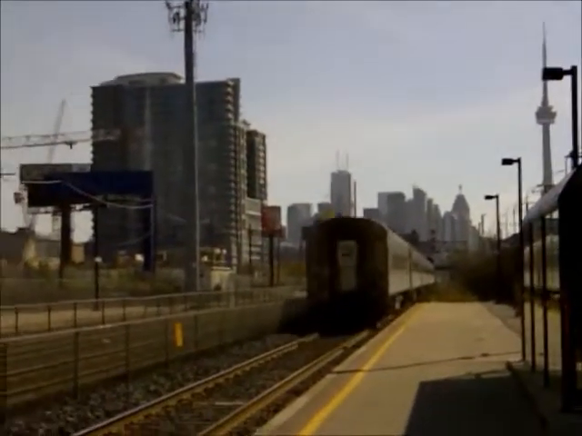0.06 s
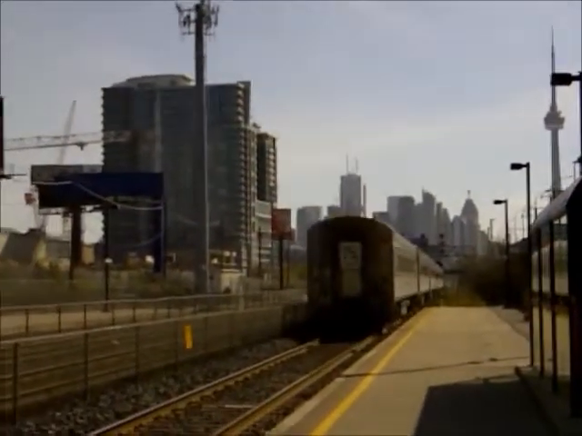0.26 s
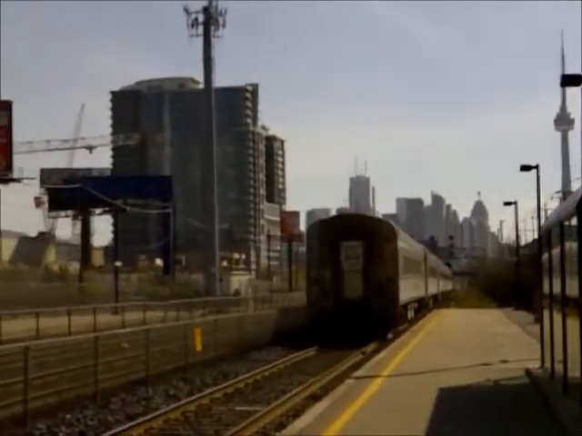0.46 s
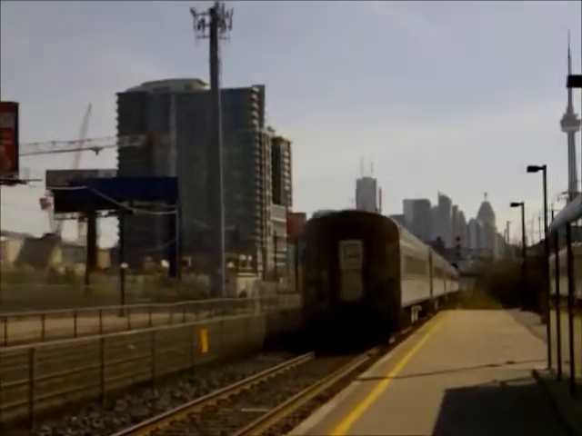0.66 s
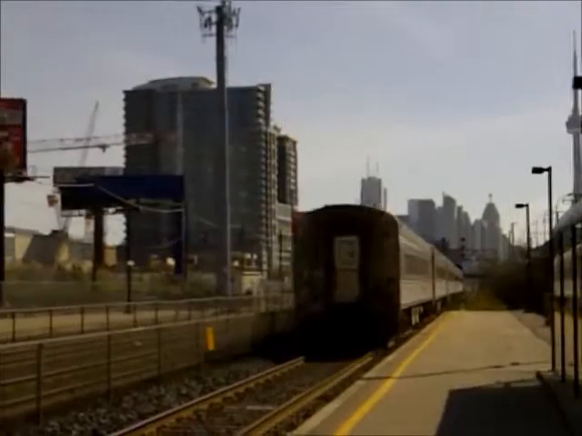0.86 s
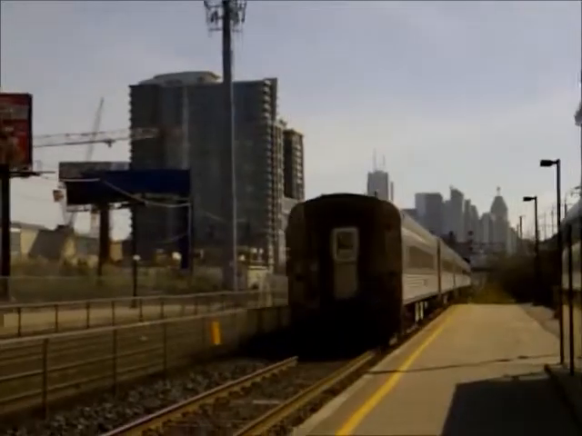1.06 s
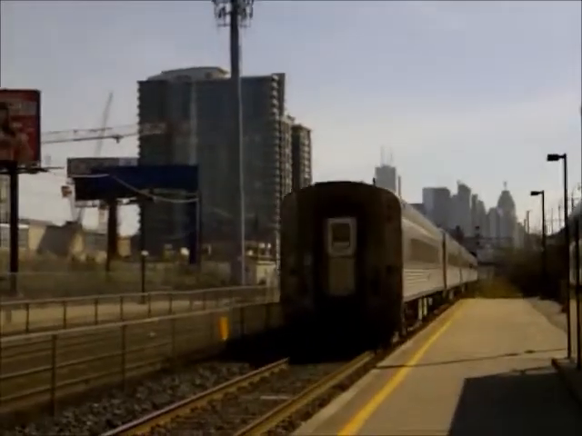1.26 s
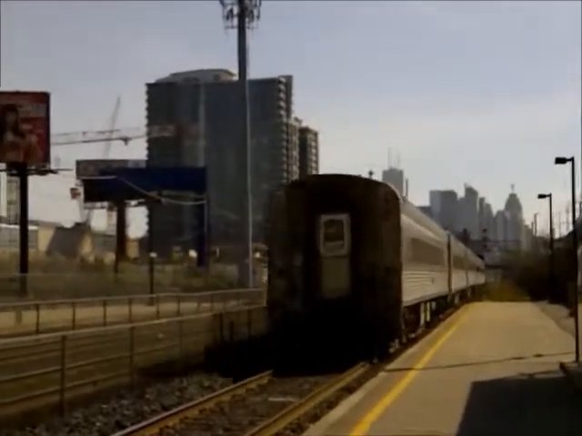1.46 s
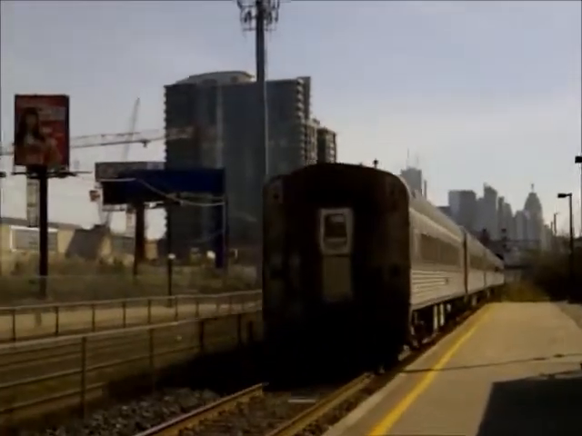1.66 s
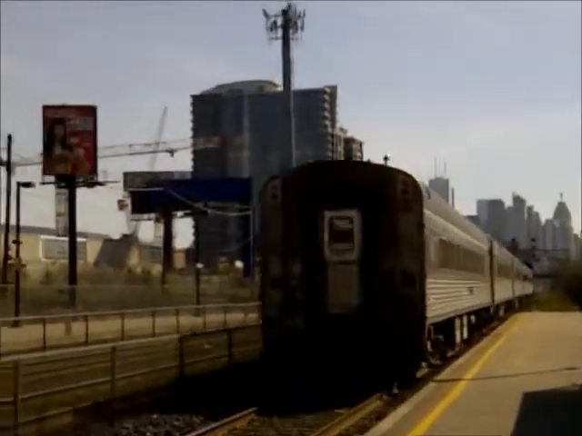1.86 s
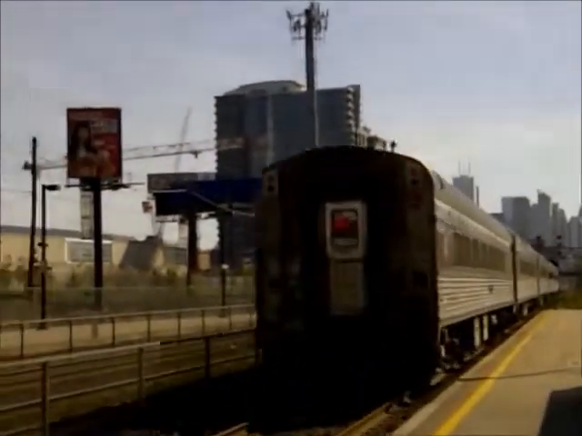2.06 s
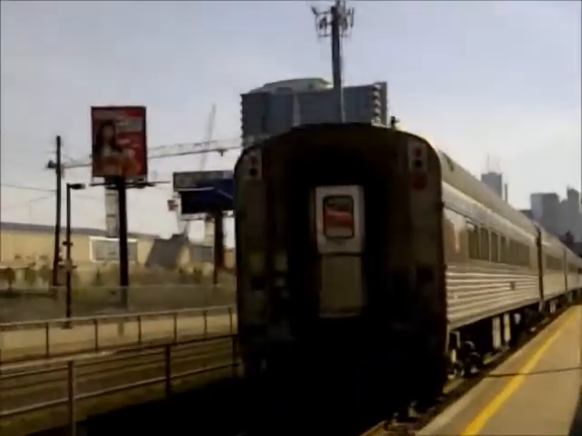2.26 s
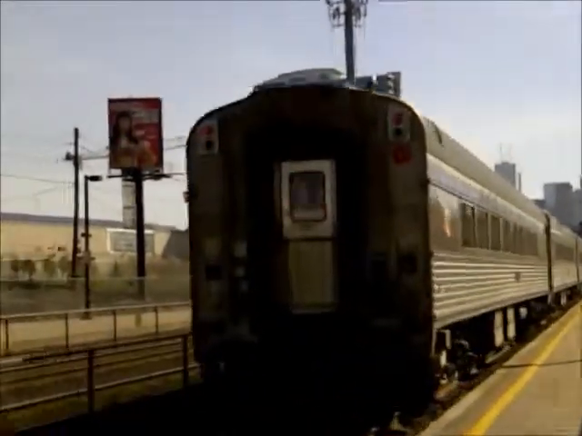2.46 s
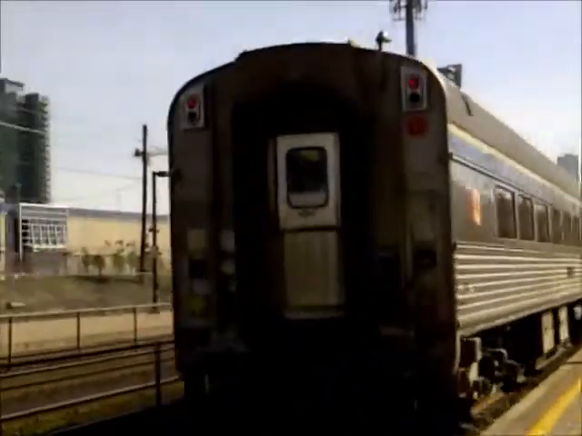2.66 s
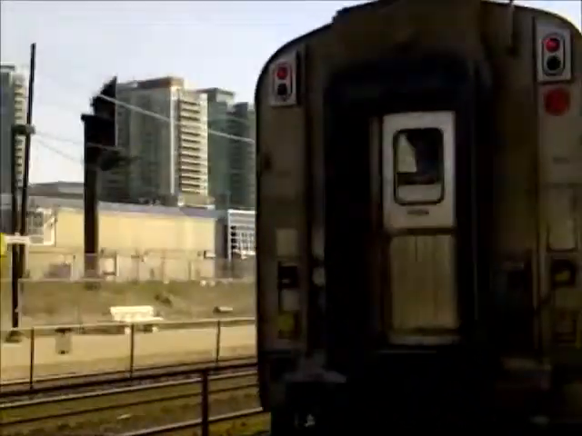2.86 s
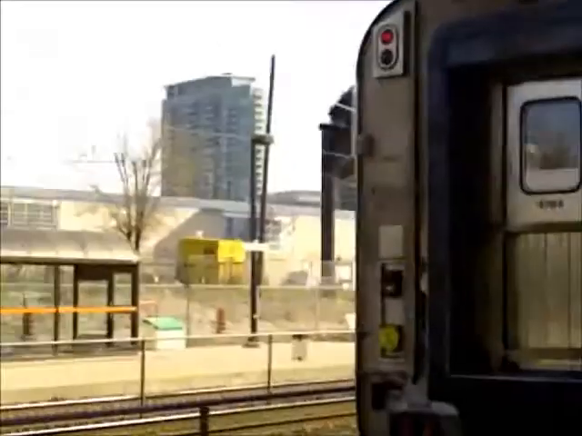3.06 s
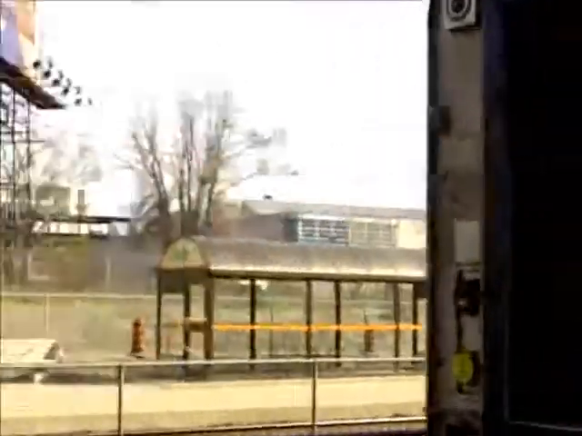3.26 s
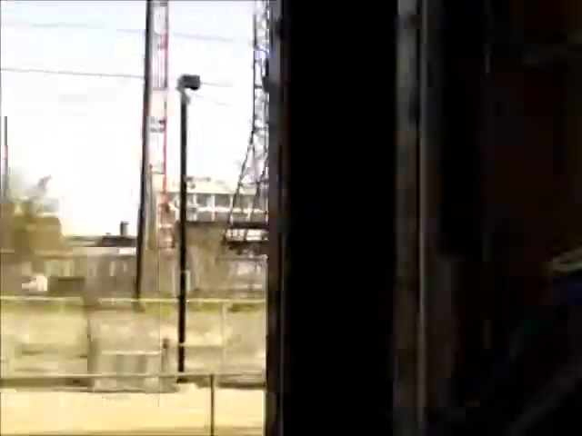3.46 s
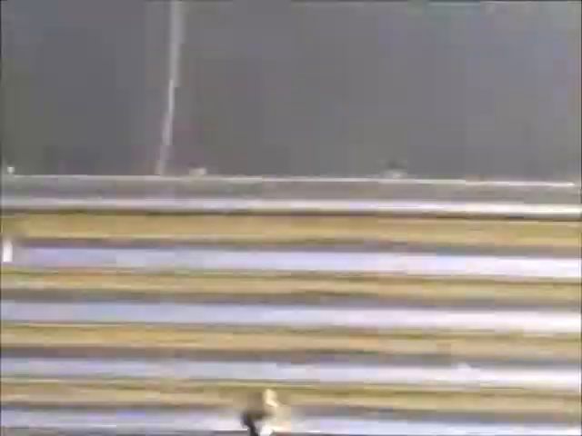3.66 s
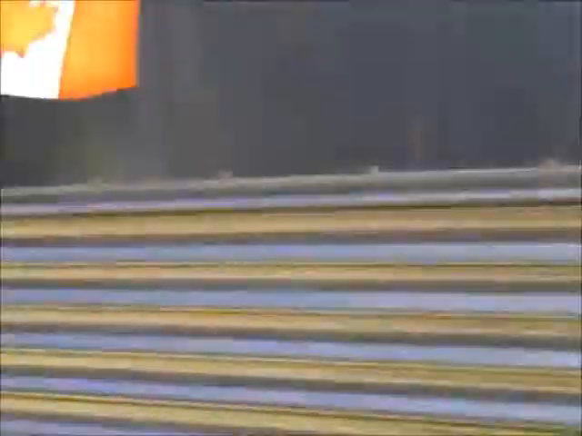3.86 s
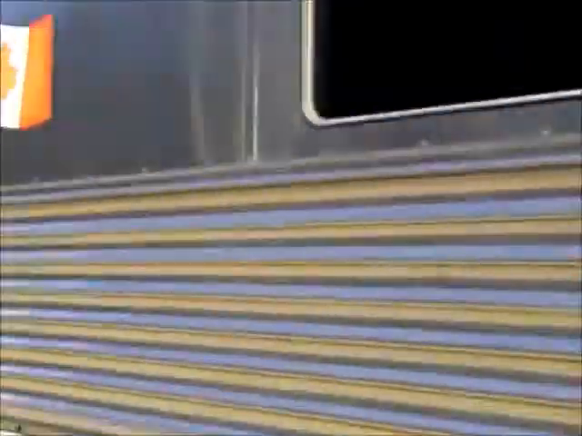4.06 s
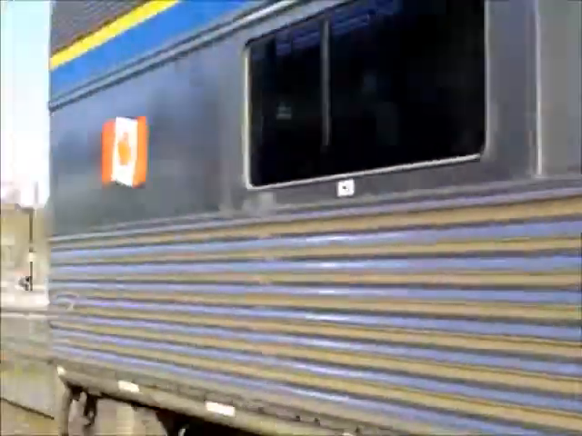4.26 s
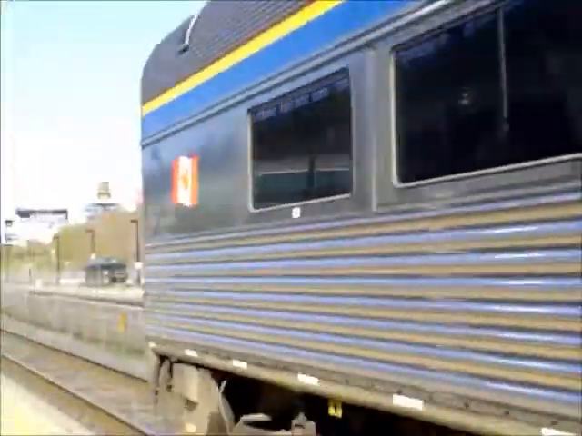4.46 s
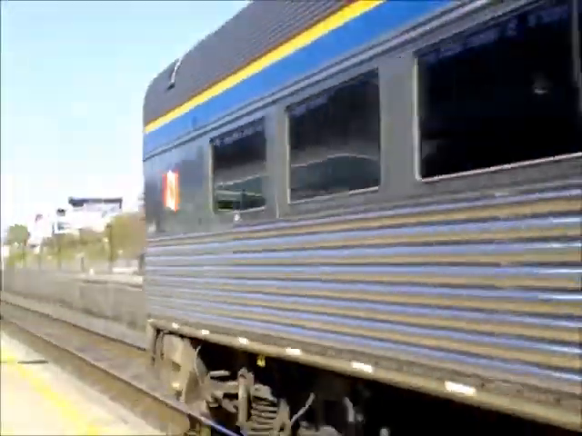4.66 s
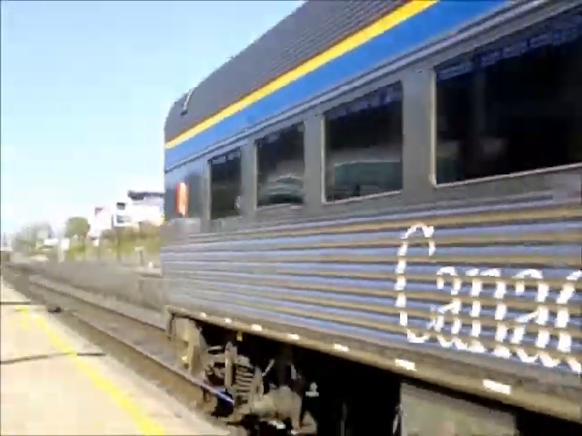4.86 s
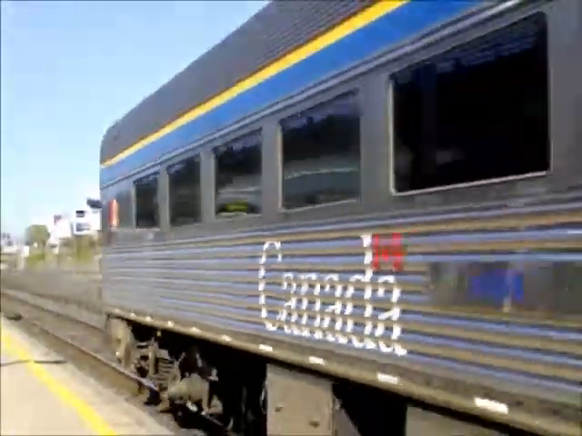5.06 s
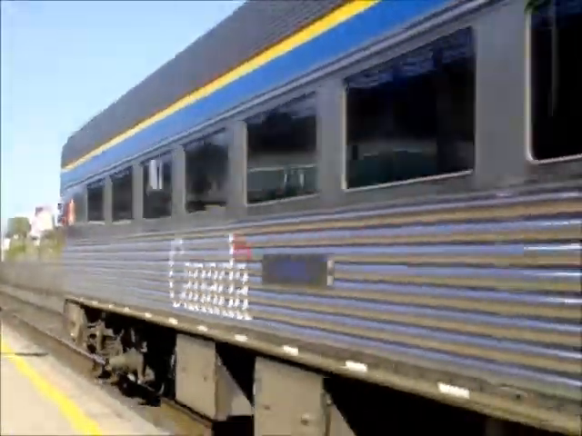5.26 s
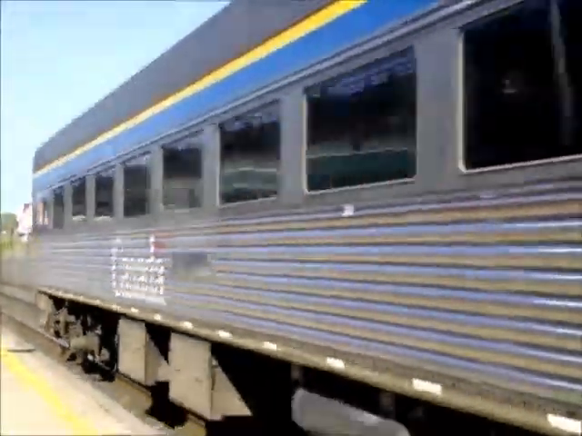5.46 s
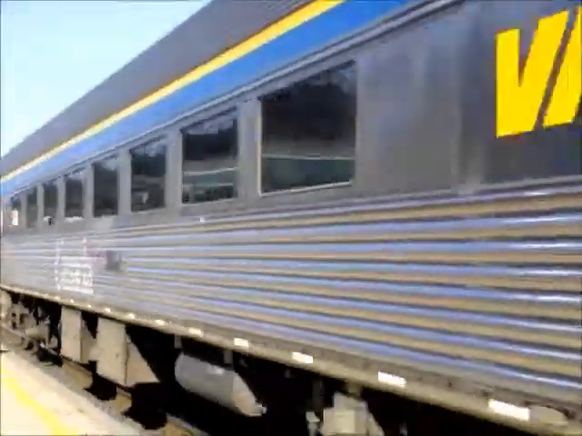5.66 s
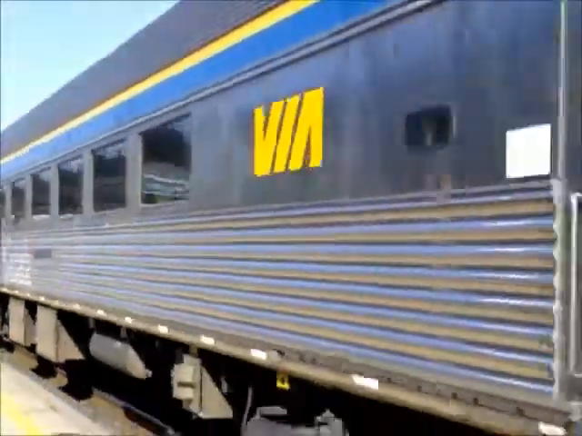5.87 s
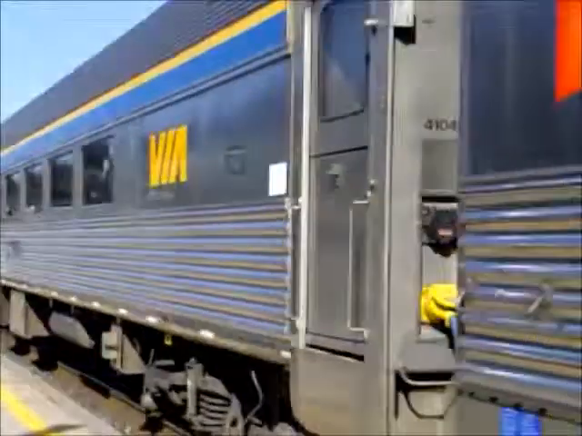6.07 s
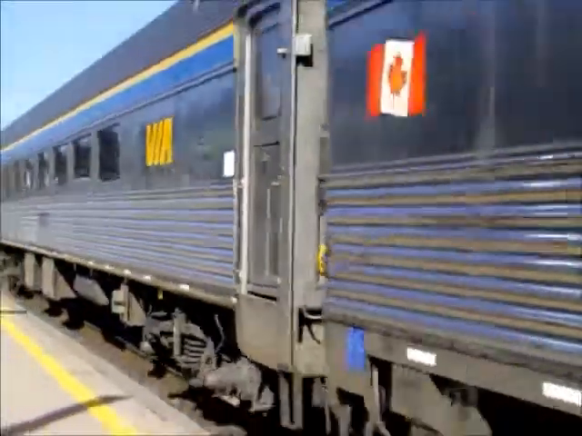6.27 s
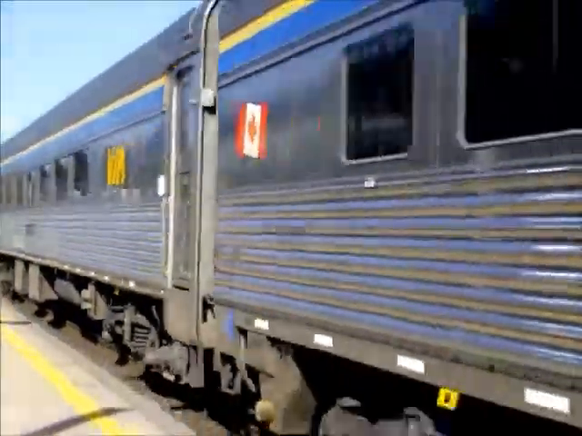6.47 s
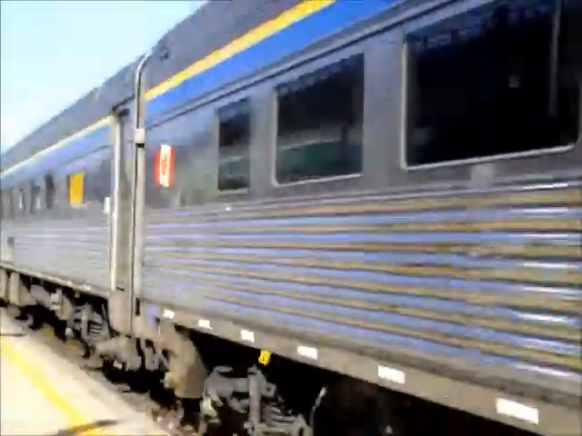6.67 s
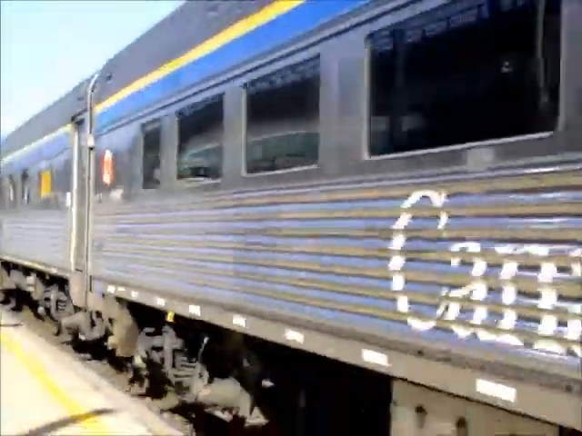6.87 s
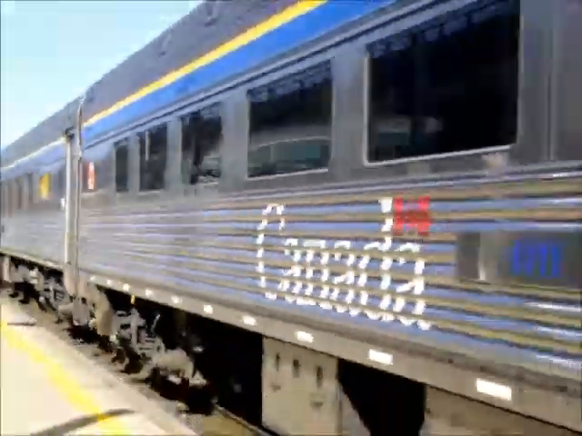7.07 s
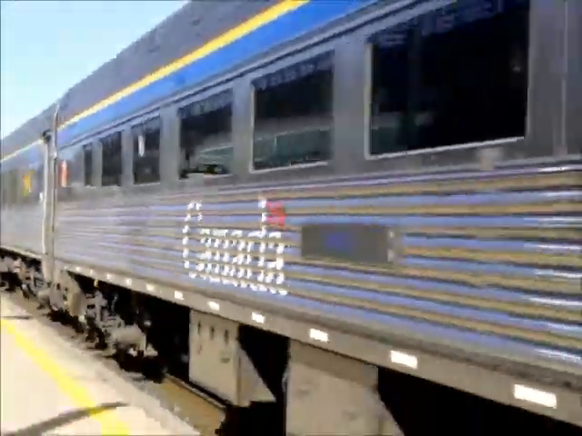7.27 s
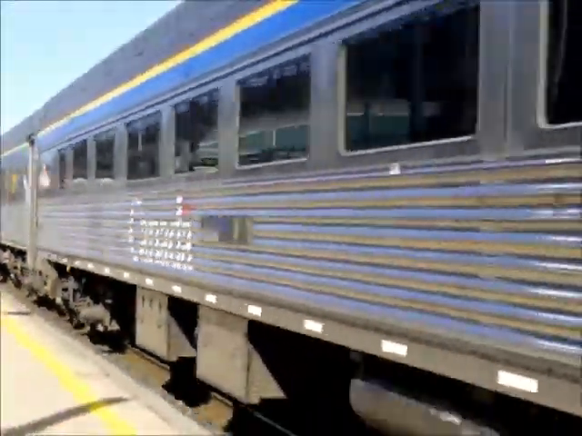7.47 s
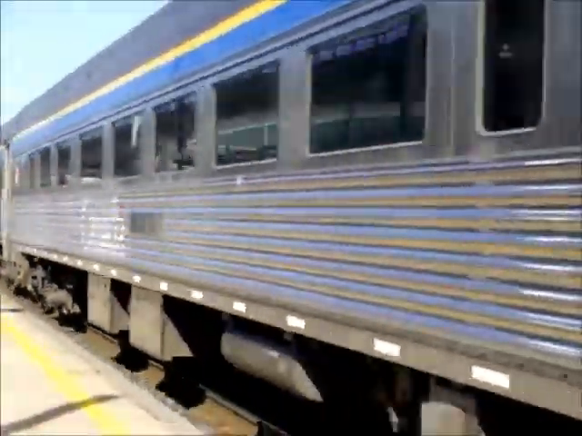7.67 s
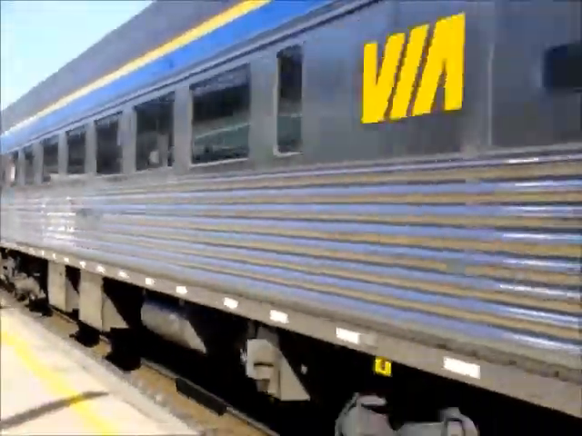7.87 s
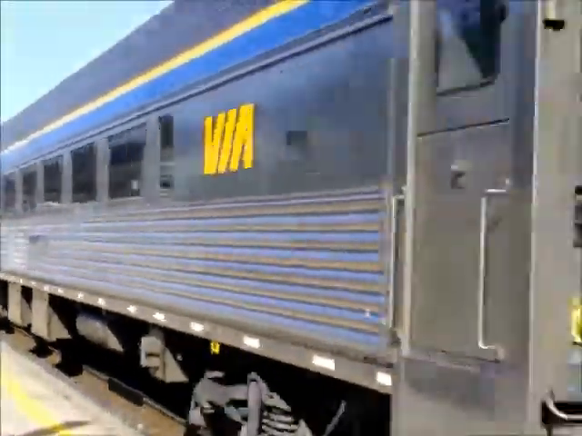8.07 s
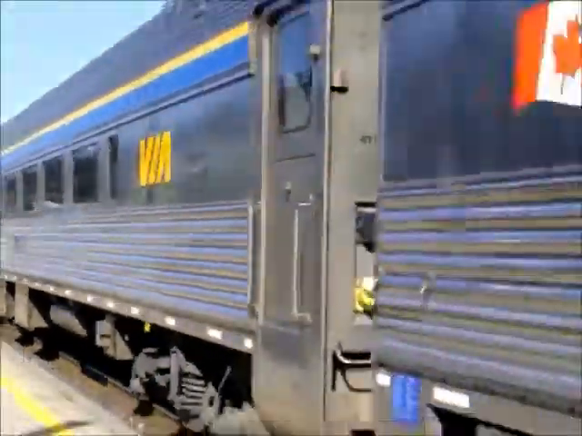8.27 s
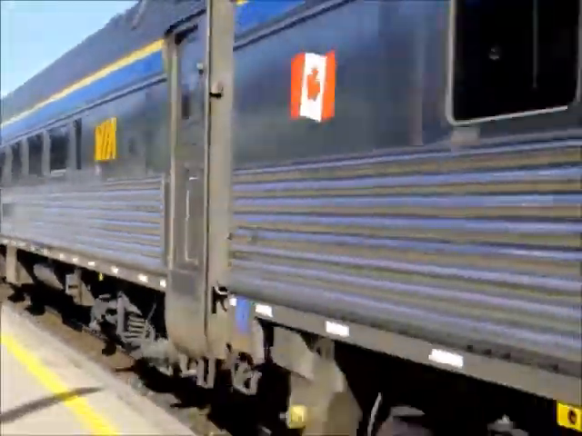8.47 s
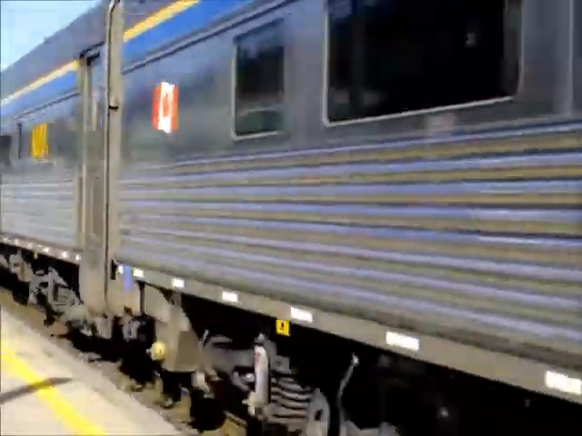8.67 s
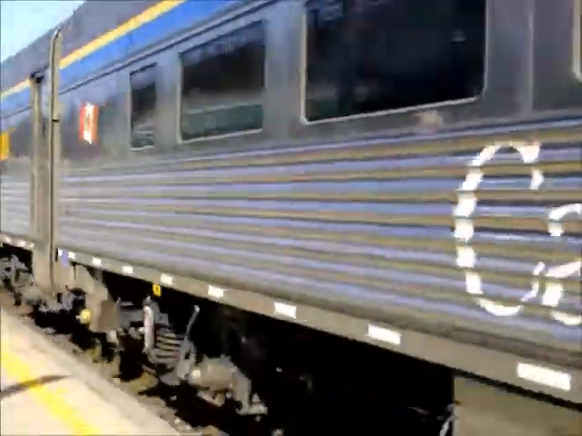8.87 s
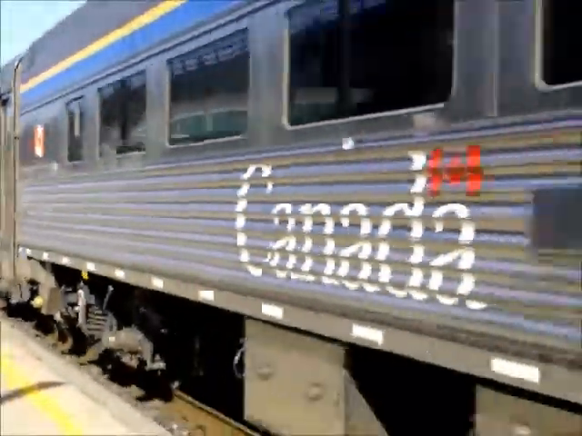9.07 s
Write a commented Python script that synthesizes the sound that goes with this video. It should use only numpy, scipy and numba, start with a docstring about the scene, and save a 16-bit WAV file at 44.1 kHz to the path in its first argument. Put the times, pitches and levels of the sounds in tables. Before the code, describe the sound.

Outdoors on a station platform, heard through a small microphone with no deep bass, a dull top and fast ducking after peaks. From 0 to 1 s there is low town rumble, a distant rail murmur, a few dry ticks and a soft clank near 0.6 s. From 1.0 to 1.6 s a dense, loud jumble of steel clanks, thuds and thin sizzle erupts. It settles into gentle rolling until 2.5 s, when more clanks run to 2.9 s. The roar swells quickly, with heavy blows at 3.2 and 3.4 s, and is full and close by 4 s. Until 9.1 s the coaches roll past in a rough, surging roar with loose clatter and faintly wavering wheel singing. Scattered clanks and short knocks mark bogies around 4.7, 5.2, 6.2, 7, 7.6 and 8.4 s. A low motor hum strengthens around 6.75 s. The roar barely eases and ends mid-pass.

```python
"""A slow passenger train rolls up to a station platform and passes close by, over a rumbling town.
Its wheels roar (bands of noise) and sing faintly (narrow noise), and a motor hums (wavering sines).
Bogies clank and loose gear clatters: short rough blows set off the fading tones of struck steel.
Broad thuds, thin sizzle and dry ticks are shaped bursts of noise.
A small microphone's fast limiter ducks just after every loud peak."""
import sys
import numpy as np
from scipy import signal
from scipy.fft import irfft, next_fast_len
from scipy.io import wavfile
from scipy.ndimage import uniform_filter1d
from numba import njit

SR = 44100
rng = np.random.default_rng(int(sys.argv[2]) if len(sys.argv) > 2 else 0)


def to_linear_factor(level_db):
    """Convert decibel levels (scalar or array-like) to linear amplitude factors."""
    exponent = np.asarray(level_db, float) / 20
    return 10 ** exponent


def pcm_store(signal):
    """Save signal as 16-bit PCM."""
    levels = np.round(np.clip(np.atleast_2d(signal), -1, 1) * 32767)
    wavfile.write(sys.argv[1], SR, levels.astype(np.int16).T)


N = 402633  # length in samples


def curve(table):
    """Columns of a table joined by straight lines in time."""
    s, *columns = np.transpose(table)
    return [np.interp(np.arange(N) / SR, s, c) for c in columns]


def unit(x):
    """Scaled to rms 1."""
    return x / np.sqrt(np.mean(x ** 2))


def peak(x):
    """Scaled to peak 1."""
    return x / np.abs(x).max()


def add(out, s, sound):
    """Mix a short sound in at a time in seconds."""
    i = int(s * SR)
    out[i:i + len(sound)] += sound[:N - i]


def walk(rate):
    """Slow chance: random levels, `rate` of them a second, joined smoothly, spread 1."""
    k = int(SR / rate)
    levels = np.repeat(rng.standard_normal(N // k + 1), k)
    return unit(uniform_filter1d(levels, k)[:N])


def band(hz, width):
    """Noise in a bell-shaped band, rms 1."""
    size = next_fast_len(N)
    f = np.arange(size // 2 + 1) * SR / size
    chance = rng.standard_normal((2, len(f)))
    spectrum = (chance[0] + 1j * chance[1]) * np.exp(-((f - hz) / width) ** 2)
    return unit(irfft(spectrum, size)[:N])


def tone(hz, width):
    """Noise ringing a resonance whose pitch may move and drifts a little."""
    turn = 2 * np.pi * np.cumsum(hz * (1 + .012 * walk(2))) / SR
    return unit(band(0, width / 2) * np.cos(turn) + band(0, width / 2) * np.sin(turn))


def controls():
    """Rolling level as the train nears and passes, and treble, bass, grind and rail ring above it."""
    # the train drawing near and rolling past:
    # (t/s, rolling level/dB, and above it: treble level/dB, bass level/dB, middle level/dB)
    approach = [(0, -32, 10, 5.5, -20), (1.0, -28, 1.5, 25.5, 5), (1.75, -24, 6.5, -5, 2),
                (2.1, -22.5, 4, 0, 3.5), (2.44, -25, 7, 0, 5.5), (3.0, -14.5, 3.5, -8.5, 1),
                (3.45, -11.5, 2, 2, -3.5), (3.95, -9, 4, -0.5, -2.5), (4.5, -11, 2.5, -1, -4),
                (5.1, -13, 6, 1, -4), (5.7, -9.5, 3.5, 2.5, -2.5), (6.3, -11, 2.5, 4, -4.5),
                (6.9, -11.5, 2.5, 4, -4), (7.6, -9.5, 2.5, 5, -2.5), (8.3, -11.5, 0, 4.5, -5.5),
                (9.13, -12, 5, 5.5, -4.5)]
    # a bogie shudders after crossing a joint: (start t/s, length/s, roll rise level/dB, treble rise level/dB)
    shudders = [(1.024, 0.25, 3.5, 5), (1.23, 0.41, 1, 4), (2.49, 0.16, 3, -1), (2.67, 0.22, 1, 4.5)]
    # the level dips briefly: (t/s, level/dB)
    dips = [(6.65, -6.5), (8.139, -6.5)]
    alongside_db = -16  # rolling level once the coaches are alongside
    edge_s, dip_s = 0.14, 0.019  # fade at both ends of a shudder, width of a dip
    bass_per_db = -2.3  # bass dB for each dB of rise: the bass does not rise with it
    ring_per_db = 0.89  # rail ring carries along the track: dB kept for each dB that distance takes

    t = np.arange(N) / SR
    roll_db, hiss_db, boom_db, grind_db = curve(approach)
    far_db = np.maximum(alongside_db - roll_db, 0)
    for s, length, rise_db, treble_db in shudders:
        on = np.clip(np.minimum(t - s, s + length - t) / edge_s + .5, 0, 1)
        roll_db = roll_db + rise_db * on
        hiss_db = hiss_db + treble_db * on
        boom_db = boom_db + bass_per_db * rise_db * on
    roll_db = roll_db + sum(db * np.exp(-((t - s) / dip_s) ** 2) for s, db in dips)
    return roll_db, hiss_db, boom_db, grind_db, ring_per_db * far_db


def roar(spectrum, lean_db, together_db, flicker_db):
    """Third-octave bands of noise that surge together and flicker alone."""
    f, db = np.transpose(spectrum)
    centres = 25 * 2 ** (np.arange(25) / 3)
    power = to_linear_factor(np.interp(np.log(centres), np.log(f), db)) ** 2 * centres
    surge = together_db * (.6 * walk(11) + 0.6 * walk(24))
    bright = together_db * (.4 * walk(7) + .5 * walk(18))  # the treble surges on its own as well
    out = np.zeros(N)
    for hz, p in zip(centres, power):
        moving_db = min(0.25 + hz / 1200, 1) * surge + np.clip(hz / 1500 - .6, 0, 1) * bright
        moving_db = moving_db + flicker_db * walk(7)
        out += np.sqrt(p / power.sum()) * to_linear_factor(lean_db(hz) + moving_db) * band(hz, 0.2 * hz)
    return out


def rolling(hiss_db, boom_db, grind_db, ring_db):
    """Rough wheel-rail contact: a broad roar, and resonances of wheel and rail kept singing by it."""
    # shape of the roar before it leans to bass, middle or treble: (f/Hz, level/dB per Hz)
    roll = [(18, -36), (30, -25.5), (64, -20), (91, -17.5), (119, -20), (238, 2), (465, -0.5), (808, -16),
            (1120, -13), (1650, -24), (2030, -34.5), (2380, -31), (2740, -40), (3960, -42), (7370, -66),
            (9580, -96), (16200, -120)]
    # rail and wheel resonances: (f/Hz, width/Hz, starting level/dB above the roll)
    sing_modes = [(2360, 300, -36), (3100, 340, -45), (3940, 480, -44), (4740, 500, -52)]
    # how strongly the wheels sing as each bogie goes by: (t/s, lower ring level/dB, upper rings level/dB)
    singing = [(0, -3, -2), (2.5, -1.5, -5.5), (3.5, 1, -2), (4.4, -1.5, -2), (4.7, 1.5, 2.5),
               (5.4, 2, 1.5), (5.8, 2, 2), (6.15, 3, 1), (6.5, 0, -2), (7.1, 1, 0), (7.35, 1.5, -1),
               (7.75, 3, -1), (8.0, 0, -2), (8.5, 0, -2), (9.13, -2, 1)]
    # the wheel rings shift in pitch: (t/s, pitch ratio)
    sing_sag = [(0, 1.0), (4.5, 1.0), (5.3, 1.02), (6.3, .995), (7.0, 1.015), (7.7, 1.0), (8.4, .975),
                (9.13, .99)]
    # low rail resonances that carry far along the track: (f/Hz, width/Hz, starting level/dB above the roll)
    rail_ring = [(279, 30, -19), (351.3, 100, -16.5), (467.8, 52, -14)]
    # the rail tone that shifts with each passing bogie: (t/s, f/Hz, level/dB above the roll)
    rail_tone = [(0, 1505, -30.5), (2.5, 1631, -37), (3.5, 1640, -22), (4.6, 1747, -22), (5.1, 1838, -28.5),
                 (7.3, 1820, -37), (7.52, 1810, -31), (7.76, 1817, -24), (7.9, 1718, -37.5),
                 (8.1, 1598, -23), (9.13, 1596, -25)]

    def lean_db(hz):
        """Extra level at a frequency: grind around 1 kHz, hiss above 600 Hz, boom below 260 Hz."""
        grind = grind_db * np.exp(-(np.log2(hz / 1000) / 0.55) ** 2)
        hiss = hiss_db * np.clip(np.log2(hz / 600) / 2, 0, 1)
        return grind + hiss + boom_db * np.clip(np.log2(260 / hz), 0, 1)

    lower_db, upper_db = curve(singing)
    sag, = curve(sing_sag)
    out = roar(roll, lean_db, together_db=0.63, flicker_db=1.84)
    for hz, width, db in sing_modes:
        strength_db = db + (lower_db if hz < 2800 else upper_db) + lean_db(hz)
        out += to_linear_factor(strength_db + 2.2 * walk(6) + 0.64 * walk(17)) * tone(hz * sag, width)
    for hz, width, db in rail_ring:
        out += to_linear_factor(db + ring_db + 2.2 * walk(4)) * tone(hz * (1 + .02 * walk(3)), width)
    rail_hz, rail_db = curve(rail_tone)
    return out + to_linear_factor(rail_db + 1.9 * walk(19)) * tone(rail_hz, 230)


def town_rumble():
    """The town behind the train: a steady roar of noise bands that flickers only a little."""
    # shape of the rumble: (f/Hz, level/dB per Hz)
    town_shape = [(15, -37), (25, 2.5), (76, -2.5), (156, -1.5), (386, -13.5), (787, -5.5), (952, -13.5),
                  (1050, -3.5), (2410, -29.5), (6090, -52), (7370, -60.5), (9580, -89), (16200, -120)]
    town_db = -27
    return to_linear_factor(town_db) * roar(town_shape, lambda hz: 0, together_db=.3, flicker_db=.6)


def hum():
    """A wavering motor tone and a fainter one at half its pitch."""
    # motor hum: (t/s, level/dB)
    hum_levels = [(0, -37.5), (3.5, -37.5), (6, -38.5), (6.75, -31), (7.6, -33.5), (8.3, -32.5),
                  (9.13, -35)]
    hum_hz, half_db = 92.2, -47.0  # middle of the wavering pitch, mean level of the half-pitch tone
    db, = curve(hum_levels)
    turn = 2 * np.pi * np.cumsum(hum_hz + 1.5 * walk(5)) / SR
    main = to_linear_factor(db + 1.2 * walk(9.6)) * np.sin(turn)
    half = to_linear_factor(half_db + 2.3 * walk(4.7)) * np.sin(turn / 2)
    return np.sqrt(2) * (main + half)  # a sine of rms 1 peaks at the root of 2


def clank(low_hz, low_db, high_hz, high_db, rise):
    """A rough blow and the rattle after it ring steel near a dull and a bright centre, with a broad crack."""
    # steel of wheel, bogie and rail when struck: (f/Hz, level/dB, time to fade by 60 dB/s)
    steel = [(199, 7.5, 0.055), (285, 4, 0.31), (382, 10, 0.06), (474, 1.5, 0.11), (650, -8, 0.014),
             (756, 11.5, 0.047), (870, 11.5, 0.031), (960, 15, 0.031), (1110, 20, 0.016), (1350, 2.5, 0.08),
             (1810, -12.5, 0.042), (2005, -1.5, 0.05), (2130, 1.5, 0.038), (2640, -2.5, 0.05),
             (2950, 1, 0.097), (3290, 2.5, 0.0093), (3450, -7, 0.049), (3780, -2, 0.083), (4450, 2, 0.039),
             (5500, -1.5, .03), (6300, -9, .03)]
    t = np.arange(int(.3 * SR)) / SR
    chance = rng.standard_normal((3, len(t)))
    rise = max(rise, .001)
    # parts knock with a new random strength every 300 samples
    ragged = np.repeat(to_linear_factor(4.2 * rng.standard_normal(len(t) // 300 + 1)), 300)[:len(t)]
    tail = ragged * (1 - np.exp(-t / rise)) * np.exp(-t / 0.12)
    push = (t / rise * np.exp(1 - t / rise)) ** 1.3

    def ring(hz, spread, blow):
        """Steel tones near one centre, spread in octaves, set off by a blow of noise."""
        f, db, t60 = np.transpose(steel)[:, :, None]
        f = f * (1 + .015 * rng.standard_normal(f.shape))  # each blow lands on another part
        short = t[:len(t) // 3]
        strength = to_linear_factor(db - 9.9 * (np.log2(f / hz) / spread) ** 2)
        fade = np.exp(-np.log(1000) * short / t60)
        modes = np.sum(strength * fade * np.sin(2 * np.pi * f * short), axis=0)
        return peak(signal.fftconvolve(blow * (push + to_linear_factor(-16) * tail), modes)[:len(t)])

    crack_band = signal.butter(2, [0.81 * high_hz, 1.07 * high_hz], "band", fs=SR, output="sos")
    crack = signal.sosfilt(crack_band, chance[2] * (push + to_linear_factor(-2.5) * tail))
    dull = ring(low_hz, 0.51, chance[0])
    bright = ring(high_hz, 0.26, chance[1]) + to_linear_factor(-9) * peak(crack)
    return to_linear_factor(low_db) * dull + to_linear_factor(high_db) * bright


def clatter(count=180):
    """Loose gear under the coaches knocks at random; few knocks are strong."""
    out = np.zeros(N)
    for when, low, high, size in rng.random((count, 4)):
        knock = clank(500 * 2 ** (2.0 * low), 0, 1900 * 2 ** (0.96 * high), -15 - 8 * high, 0.0051)
        add(out, when * N / SR, to_linear_factor(-2.2 * np.log(size + 0.2)) * knock)
    return out


def tick():
    """A dry click of about a millisecond, treble only."""
    t = np.arange(int(.01 * SR)) / SR
    burst = rng.standard_normal(len(t)) * np.exp(-t / 0.0013)
    return peak(signal.sosfilt(signal.butter(2, 3500, "high", fs=SR, output="sos"), burst))


def ticks():
    """Dry ticks close by, each a tiny burst of treble noise."""
    # the ticks: (t/s, peak level/dB)
    tick_times = [(0.1266, -31), (0.2852, -30.5), (0.449, -20.5), (0.467, -29.5), (0.6842, -41),
                  (0.9943, -25)]
    out = np.zeros(N)
    for s, db in tick_times:
        add(out, s, to_linear_factor(db) * tick())
    return out


def clanks():
    """The distinct wheel and coupling clanks; a harder blow builds up more slowly."""
    # the blows: (t/s, dull ring f/Hz, dull ring peak level/dB, bright ring f/Hz, bright ring peak level/dB)
    blows = [(0.568, 322, -16, 2100, -51), (0.605, 384, -9.5, 3030, -38.5), (1.036, 1094, -1.5, 2080, -25),
             (1.05, 954, -12, 2060, -24), (1.076, 481, -3.5, 2040, -27), (1.111, 382, -4, 2040, -26),
             (1.151, 403, -11, 2640, -35), (1.204, 472, -21, 2640, -38.5), (1.24, 835, -4, 2130, -16),
             (1.248, 920, -0.5, 2130, -18), (1.262, 650, -1, 4450, -28.5), (1.277, 947, -10, 2980, -25),
             (1.313, 340, -5.5, 2950, -24), (1.331, 990, -13, 2030, -30), (1.371, 1290, -13.5, 3890, -36),
             (1.391, 330, -16, 2640, -29), (1.415, 1370, -16, 3350, -31), (1.449, 975, -10.5, 2130, -19.5),
             (1.466, 940, -12.5, 2130, -22), (1.486, 960, -16, 2130, -27), (1.523, 796, -15.5, 3290, -31),
             (1.574, 317, -13, 3600, -35.5), (2.495, 483, -19.5, 1220, -14), (2.607, 380, -6, 3780, -35),
             (2.691, 960, -14, 4450, -37.5), (2.715, 364, -9.5, 2240, -25.5), (2.756, 372, -7, 3090, -29),
             (2.78, 397, -8, 2130, -31.5), (2.825, 285, -10.5, 3200, -28), (2.86, 960, -19, 2490, -31.5),
             (2.899, 383, -13.5, 4220, -34.5), (3.219, 426, -4, 1150, -12.5), (3.395, 337, 0, 3620, -30.5),
             (4.672, 870, -11.5, 2460, -29), (4.852, 960, -13.5, 2550, -36), (5.102, 762, -7.5, 2420, -37),
             (5.301, 793, -10.5, 2520, -26), (5.325, 650, -11, 2080, -33), (6.15, 650, -10, 2130, -30),
             (6.181, 773, -11.5, 2050, -30.5), (6.387, 1100, -13, 2160, -19),
             (7.102, 760, -16, 2950, -29.5), (7.415, 773, -7.5, 2130, -22.5),
             (7.622, 890, -14.5, 2260, -23), (7.706, 650, -11, 2950, -35),
             (7.857, 1530, -24.5, 2950, -24.5), (8.072, 680, -19, 1980, -41)]
    rise_s, hard_rise_s = .004, 0.0039  # a blow builds over the first plus the second times its peak size
    out = np.zeros(N)
    for s, low_hz, low_db, high_hz, high_db in blows:
        rise = rise_s + hard_rise_s * to_linear_factor(low_db)
        add(out, s, clank(low_hz, low_db, high_hz, high_db, rise))
    return out


def sizzle():
    """Thin metallic sizzle over the harder blows: a band of high noise switched in briefly."""
    # the bursts: (start t/s, length/s, level/dB)
    bursts = [(1.032, 0.017, -52), (1.129, 0.02, -55.5), (1.233, 0.047, -45.5), (1.303, 0.019, -63),
              (1.44, .045, -51), (2.495, .01, -52), (2.695, 0.04, -50), (2.834, 0.017, -55.5),
              (7.6, .04, -59)]
    t, fade_s = np.arange(N) / SR, .008
    level = np.zeros(N)
    for s, length, db in bursts:
        rise = np.clip((t - s) / .003, 0, 1)
        level += to_linear_factor(db) * rise * np.exp(-np.maximum(t - s - length, 0) / fade_s)
    return level * band(6300, 1100)


def thud(length, low_hz, high_hz):
    """A ragged burst of broad noise that leans to its low end, rms near 1 while it lasts."""
    rise_s, fade_s = .003, .009
    t = np.arange(int(.16 * SR)) / SR
    shape = np.clip(t / rise_s, 0, 1) * np.exp(-np.maximum(t - length, 0) / fade_s)
    ragged = np.repeat(to_linear_factor(2.5 * rng.standard_normal(len(t) // 200 + 1)), 200)[:len(t)]
    noise = shape * ragged * rng.standard_normal(len(t))
    lean = signal.sosfilt(signal.butter(1, low_hz, fs=SR, output="sos"), noise)
    burst = signal.sosfilt(signal.butter(4, [low_hz, high_hz], "band", fs=SR, output="sos"), lean)
    return unit(burst) * np.sqrt(np.mean(shape ** 2))


def thuds():
    """Dull, broad knocks of wheels and gear, damped too fast to ring."""
    # the knocks: (t/s, length/s, lowest f/Hz, highest f/Hz, rms level/dB)
    knocks = [(1.046, .085, 890, 3470, -30), (1.238, .05, 1000, 4520, -28), (1.33, .1, 985, 4800, -37.5),
              (1.543, 0.098, 1200, 4500, -39.5), (1.303, 0.011, 2500, 5940, -37),
              (1.37, 0.022, 1800, 4760, -44.5), (1.446, .02, 2480, 4770, -42.5),
              (1.519, 0.0031, 3000, 6750, -43), (4.663, 0.012, 1890, 3060, -32),
              (5.261, 0.018, 2300, 3390, -34), (5.466, 0.0093, 2360, 4300, -39),
              (6.389, 0.02, 1860, 3100, -31.5), (6.929, 0.029, 1990, 4160, -30.5),
              (6.941, 0.0095, 603, 1460, -18), (7.125, 0.039, 2320, 4700, -37.5),
              (7.564, 0.0087, 2220, 4140, -29.5), (7.633, 0.0088, 1790, 5500, -36.5),
              (7.785, 0.009, 800, 1600, -25.5), (7.85, 0.0096, 990, 2580, -21),
              (8.296, 0.02, 897, 1620, -19.5), (8.316, 0.022, 2000, 4870, -38),
              (8.448, 0.01, 900, 1670, -27.5), (8.516, .022, 750, 1526, -18.5),
              (8.524, 0.018, 1780, 5500, -38.5)]
    out = np.zeros(N)
    for s, length, low_hz, high_hz, db in knocks:
        add(out, s, to_linear_factor(db) * thud(length, low_hz, high_hz))
    return out


def scene():
    """Train, town, hum, ticks, clanks, sizzle and thuds as one channel."""
    roll_db, *colour_db = controls()
    train = to_linear_factor(roll_db) * (rolling(*colour_db) + to_linear_factor(-9.5) * clatter())
    blows = ticks() + clanks() + sizzle() + thuds()
    return (train + town_rumble() + hum() + blows)[None]


@njit
def limiter(x, top, attack, release, lag, depth):
    """The gain drops a moment after a peak passes the threshold, overshoots and recovers."""
    y, e = np.empty(len(x)), 0.
    for i in range(len(x)):
        seen = abs(x[max(i - lag, 0)])
        e += (seen - e) * (attack if seen > e else release)
        y[i] = x[i] * (top / max(e, top)) ** depth
    return y


def low_pass(x):
    """Removes everything above the highest recorded frequency."""
    return signal.sosfilt(signal.butter(12, 7520, fs=SR, output="sos"), x)


def record(dry):
    """Small microphone without deep bass, fast limiter, rounded peaks and a steep top cut."""
    low_hz, top_hz = 40.4, 8670  # bass cut, and where the top cut reaches its full 50 dB
    limit_db, depth = -3.5, 2.04  # a depth above 1 pulls the level below the threshold
    attack_s, release_s, lag_s = 0.0006, 0.059, 0.00088
    held = signal.sosfilt(signal.butter(5, low_hz, "high", fs=SR, output="sos"), dry[0])
    held = limiter(held, 1. * to_linear_factor(limit_db), 1 / (attack_s * SR), 1 / (release_s * SR), int(lag_s * SR), depth)
    held = 0.95 * np.tanh(held / 1.109)
    held = signal.sosfilt(signal.cheby2(8, 50, top_hz, fs=SR, output="sos"), held)
    return low_pass(held[None])


dry = scene()
out = record(dry)
pcm_store(out)
```